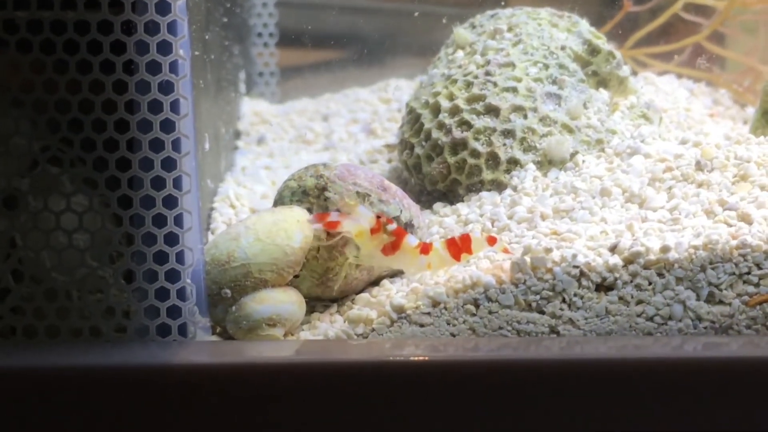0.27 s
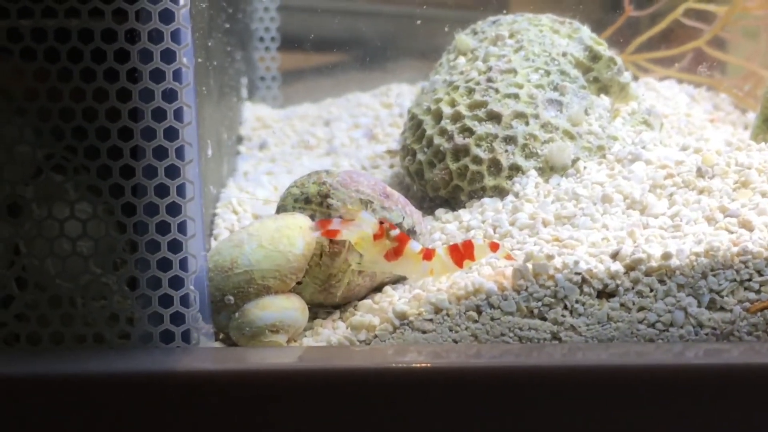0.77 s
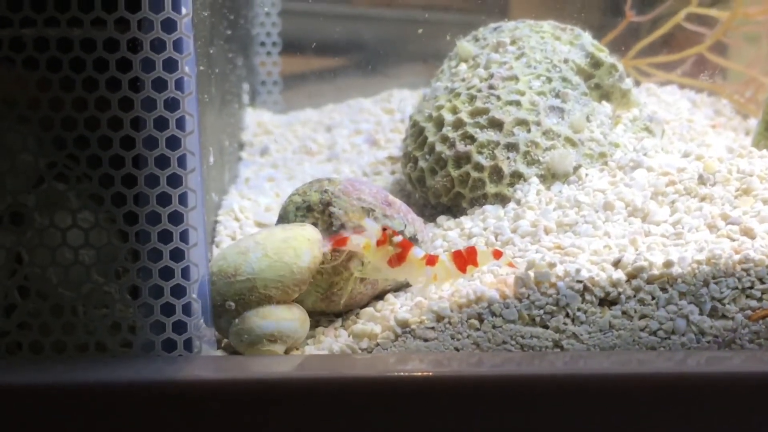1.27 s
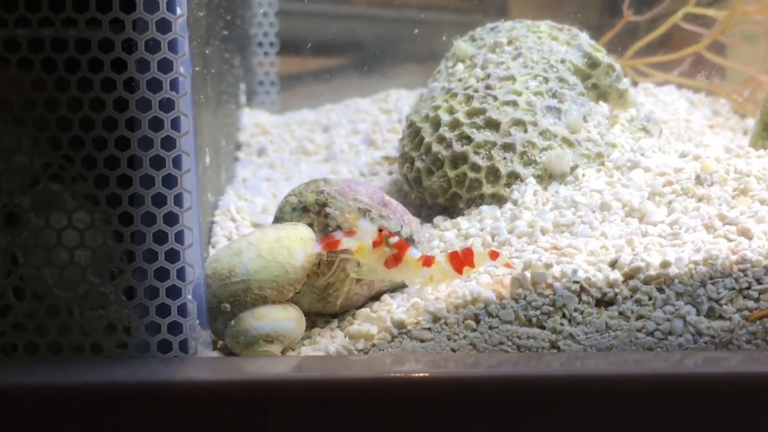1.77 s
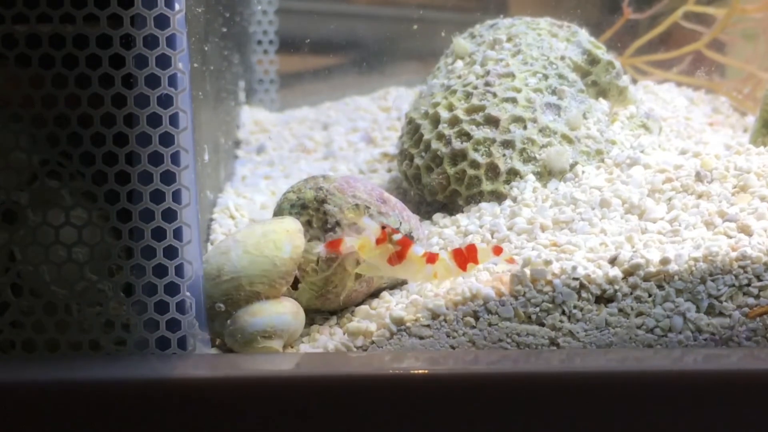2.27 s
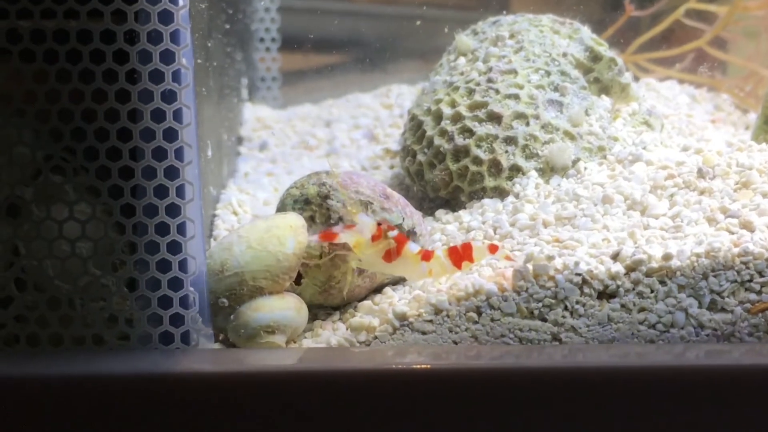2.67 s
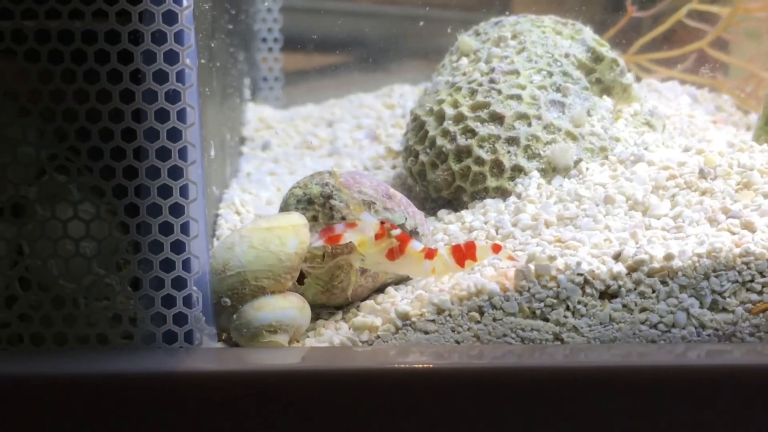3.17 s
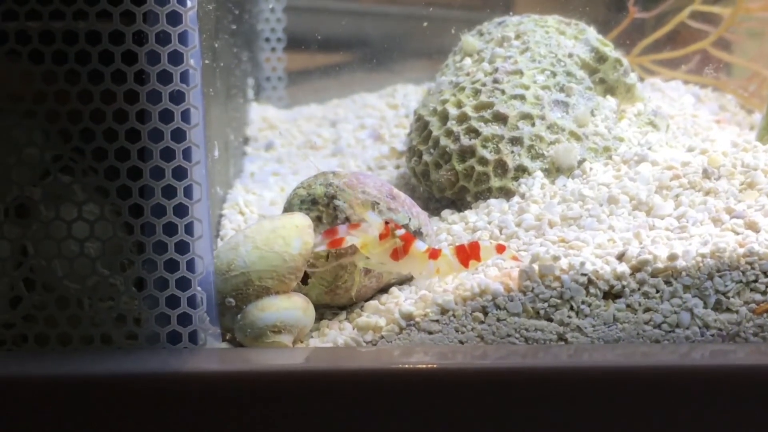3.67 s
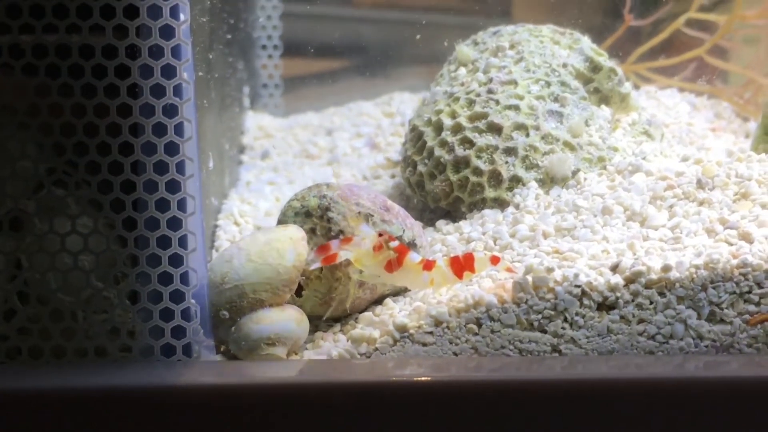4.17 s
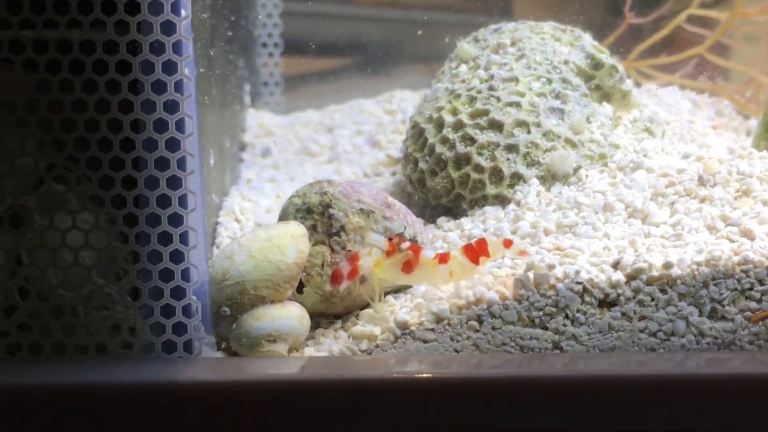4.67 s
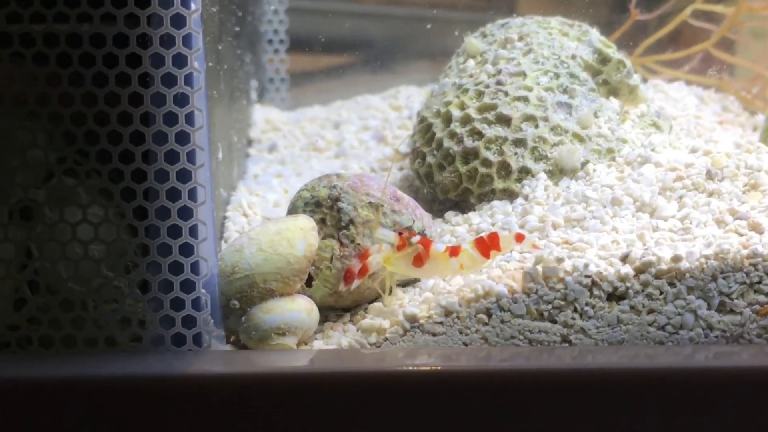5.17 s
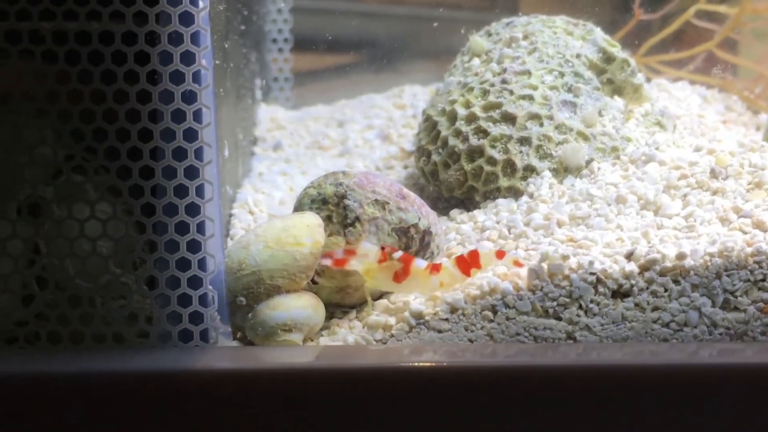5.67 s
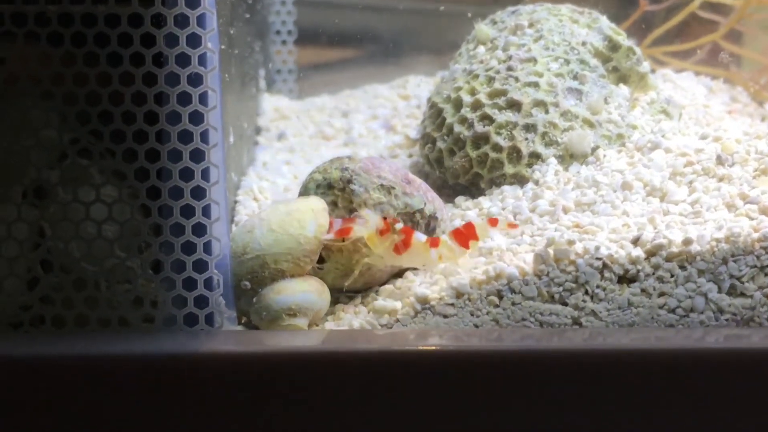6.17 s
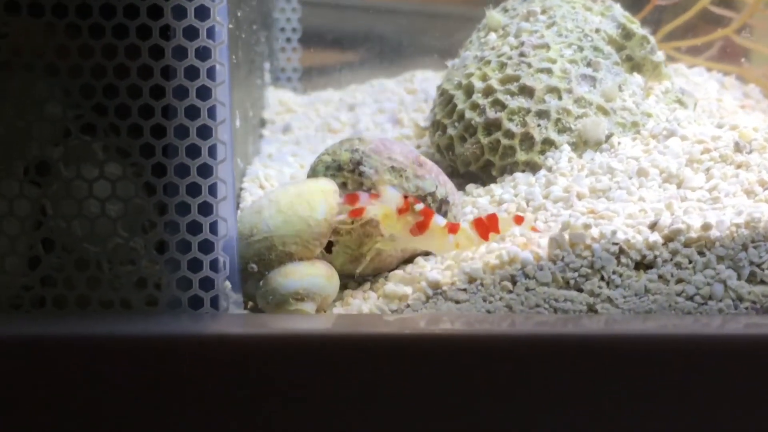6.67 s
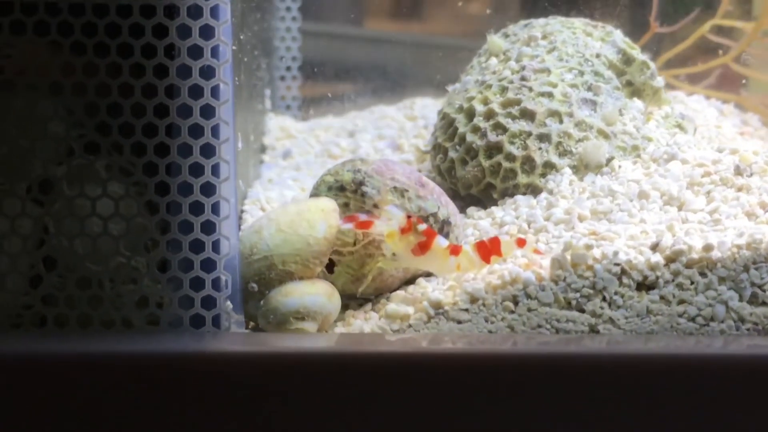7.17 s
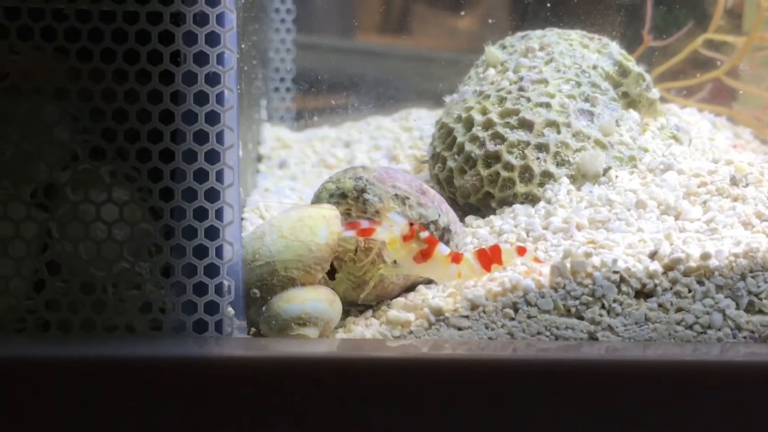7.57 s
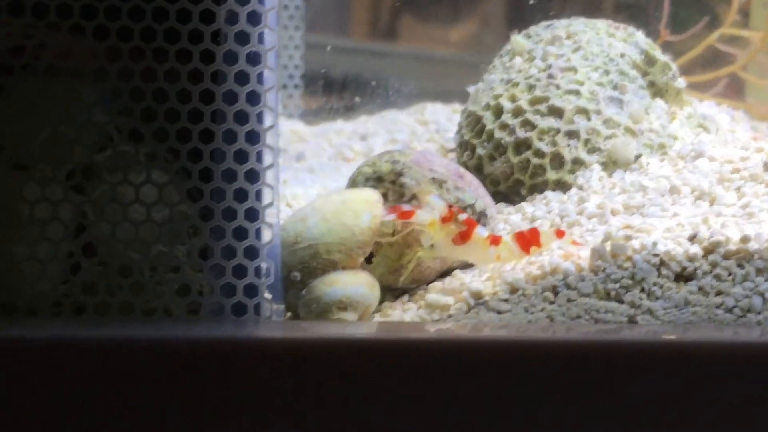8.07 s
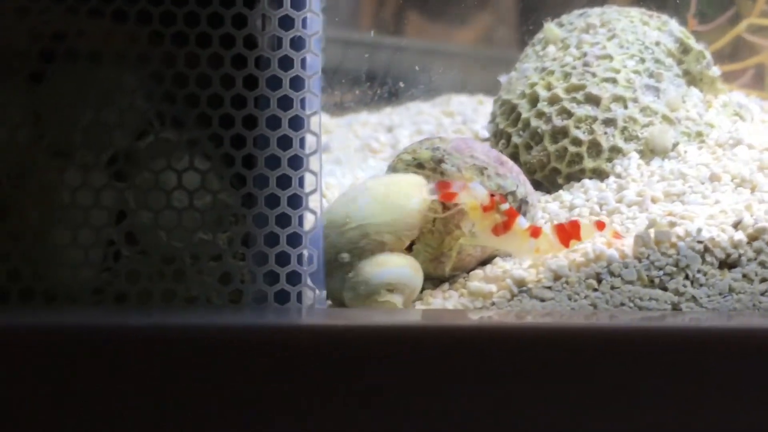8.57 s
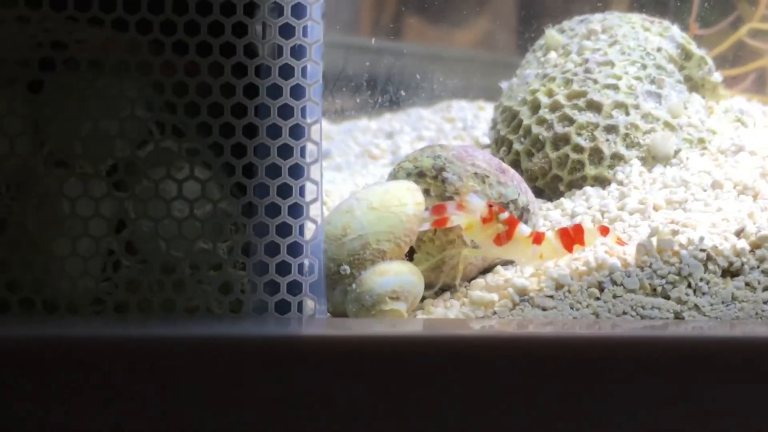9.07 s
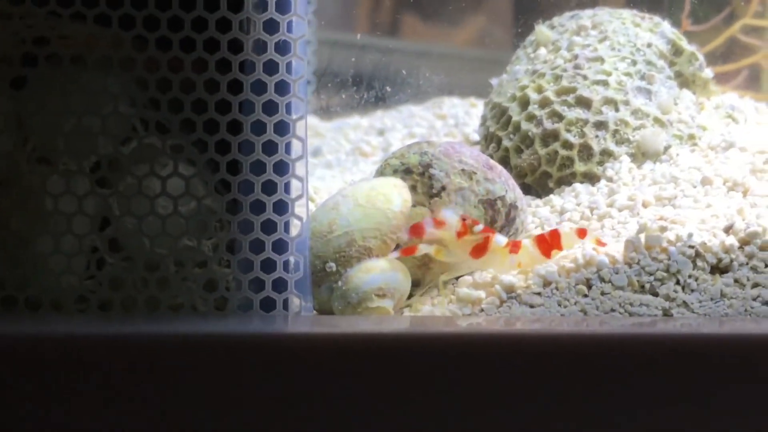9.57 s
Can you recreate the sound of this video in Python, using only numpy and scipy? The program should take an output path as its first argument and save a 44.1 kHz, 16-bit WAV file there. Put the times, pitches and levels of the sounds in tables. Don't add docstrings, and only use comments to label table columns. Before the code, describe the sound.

A low electrical aquarium hum with faint bubbling runs throughout, broken by two bright claw cracks early and a louder one near eight seconds.

```python
import sys
import numpy as np
from scipy import signal
from scipy.fft import rfft, irfft, next_fast_len
from scipy.io import wavfile
from scipy.ndimage import uniform_filter1d

SR = 44100
rng = np.random.default_rng(int(sys.argv[2]) if len(sys.argv) > 2 else 0)


def rack_gain(trim_db):
    fader = np.asarray(trim_db, float)
    return 10 ** (fader / 20)


def unload_audio(sound):
    columns = np.transpose(np.atleast_2d(sound))
    steps = np.round(np.clip(columns, -1, 1) * 32767)
    wavfile.write(sys.argv[1], SR, steps.astype(np.int16))


N = 432178


def read(points, hz):
    f, value = np.transpose(points)
    return np.interp(np.log(hz + 1), np.log(f + 1), value)


def add(mix, s, sound):
    part = mix[round(s * SR):][:len(sound)]
    part += sound[:len(part)]


def coloured(x, points):
    size = next_fast_len(len(x))
    gain = rack_gain(read(points, np.fft.rfftfreq(size, 1 / SR)))
    return irfft(rfft(x, size) * gain, size)[:len(x)]


def band(x, low_hz, high_hz):
    return signal.sosfilt(signal.butter(4, [low_hz, high_hz], "band", fs=SR, output="sos"), x)


# frequency in Hz, level in dB per Hz.
RUMBLE = [(15, -101), (25, -80), (35, -73.5), (50, -68), (62, -59.5), (75, -68.5), (90, -71.5), (110, -71),
          (150, -74.5), (190, -74.5), (230, -78), (280, -82), (400, -90.5), (600, -95.5)]
# frequency in Hz, level in dB per Hz.
HISS = [(300, -100), (600, -93.5), (1000, -93), (1550, -97.5), (2900, -99.5), (4500, -101), (4900, -103),
        (5600, -99), (9000, -98), (10000, -99), (10450, -104), (11200, -100), (15500, -106), (17000, -110)]
# frequency in Hz, width in Hz, level in
# dB rms.
RESONANCES = [(56.36, 3.9, -48.5), (69.7, 2.5, -56.5), (88, 2.7, -59), (199.5, 5.1, -61), (210.4, 4.7, -57.5),
              (242.6, 6.5, -66.5), (344.6, 52, -69), (499, 49, -72.5),
              (712, 20, -72), (762, 14, -73), (806, 16, -74.5), (1055, 34, -68.5), (1296, 91, -76),
         (1891, 96, -77), (2234, 15.66, -75.5), (2196, 430, -68), (2410, 110, -76.5), (2887, 94, -77.5),
         (3248, 300, -75.5), (6200, 250, -77.5)]
# frequencies in Hz, then the level of each in dB rms.
WHINE_HZ = [1620, 2889, 3191, 4065, 5110, 6240, 6659, 7158]
WHINE_DB = [-79, -79.5, -83, -88.5, -82, -85.5, -80.5, -81.5]


def flow_power(hz):
    rumble = rack_gain(read(RUMBLE + [(3000, -140)], hz)) ** 2
    hiss = rack_gain(read([(50, -140)] + HISS, hz)) ** 2
    power = rumble + hiss
    whines = [(f, 8, db) for f, db in zip(WHINE_HZ, WHINE_DB)]
    for centre, width, db in RESONANCES + whines:
        bell = np.exp(-2 * ((hz - centre) / width) ** 2)
        power = power + rack_gain(db) ** 2 * bell / (width * np.sqrt(np.pi / 2))
    return power


def flow():
    patchy_db, swell_db = 0.95, 1.03
    swell_hz = 2500
    size = next_fast_len(N)
    power = flow_power(np.fft.rfftfreq(size, 1 / SR))
    x = irfft(rfft(rng.standard_normal(size)) * np.sqrt(power * SR / 2), size)[:N]
    z = signal.stft(x, nperseg=1024)[2]
    patches = uniform_filter1d(rng.standard_normal(z.shape), size=8, axis=0)
    patches = uniform_filter1d(patches, size=8, axis=1)
    swell = uniform_filter1d(rng.standard_normal(z.shape[1]), size=25)
    share = 1 / (1 + (np.fft.rfftfreq(1024, 1 / SR)[:, None] / swell_hz) ** 2)
    field_db = patchy_db * patches / patches.std() + swell_db * share * swell / swell.std()
    return signal.istft(z * rack_gain(field_db), nperseg=1024)[1][:N]


# multiple of the mains frequency, level in dB rms.
HUM = [(1, -42.5), (2, -40.5), (3, -51), (5, -69), (6, -74.5), (7, -77.5), (8, -71.5), (13, -86), (15, -78),
       (18, -85), (19, -76.5), (27, -83)]
# frequencies in Hz, then the level of each in dB rms.
ROTOR_HZ = [178.26, 351, 419, 491]
ROTOR_DB = [-59, -74, -80, -78]


def hum():
    mains_hz = 59.991
    lag = 1.3
    t = np.arange(N) / SR
    out = np.zeros(N)
    for k, db in HUM:
        out += rack_gain(db) * np.cos(k * 2 * np.pi * mains_hz * t - lag * (k - 1))
    for hz, db in zip(ROTOR_HZ, ROTOR_DB):
        out -= rack_gain(db) * np.cos(2 * np.pi * hz * t)
    return np.sqrt(2) * out


BUBBLE_HZ = (900, 3200)


def bubbles():
    level_db, per_second, pitches = -69.5, 46, 16
    t = np.arange(1500) / SR
    out = np.zeros(N)
    for hz in np.geomspace(*BUBBLE_HZ, pitches):
        ping = np.sin(2 * np.pi * hz * t * (1 + 3.0 * t))
        ping = ping * np.exp(-t / .006) * np.clip(t / 0.0014, 0, 1)
        size = rack_gain(3.18 * np.minimum(rng.exponential(1, N), 2))
        born = rng.random(N) < per_second / pitches / SR
        out += signal.oaconvolve(size * born, ping)[:N]
    return rack_gain(level_db) * out


# start in seconds, level in dB, frequency in Hz, time to fall 60 dB in s.
KNOCK = (6.922, -38, 170, .12)


def add_knock(mix):
    s, db, hz, t60 = KNOCK
    t = np.arange(SR // 4) / SR
    add(mix, s, rack_gain(db - 60 * t / t60) * np.sin(2 * np.pi * hz * t) * np.clip(t / 0.012, 0, 1))


# start in seconds, level in dB as heard through the noise reducer,
# lowest Hz, highest Hz, time to fall 60 dB in seconds.
TICKS = [(.744, -64, 3500, 10000, 0.19), (3.917, -58, 3800, 6300, .05), (3.924, -63.5, 3240, 6300, .4),
         (7.845, -63.5, 4020, 13000, 0.3), (7.848, -67, 12200, 12700, 0.092), (7.85, -65, 9150, 9800, .4),
         (7.848, -62, 6000, 7000, 0.52), (7.895, -69.5, 7000, 12000, .1), (8.884, -64.5, 5830, 7350, 0.73),
         (8.886, -58, 8400, 9600, .12), (8.915, -64, 8400, 9600, .12), (8.886, -64.5, 3000, 4400, 0.25)]


def add_ticks(mix):
    t = np.arange(SR // 2) / SR
    for s, db, low_hz, high_hz, t60 in TICKS:
        x = band(rng.standard_normal(len(t)), low_hz, high_hz)
        rustle = rack_gain(-60 * t / t60)
        click = rack_gain(-8 - 60 * t / 0.026)
        grain = x / x.std() * (rustle + click) * np.clip(t / 0.002, 0, 1)
        add(mix, s, rack_gain(7.5 + db) * grain)


# frequency in Hz, time to fall 60 dB in seconds.
ROOM = [(1000, 0.44), (4000, 0.44), (8000, 0.51), (12000, 0.4), (16000, 0.28)]


def room(length):
    hz, t, z = signal.stft(rng.standard_normal(length), SR, nperseg=256)
    fade = rack_gain(-60 * t / read(ROOM, hz)[:, None])
    tail = signal.istft(z * fade, SR, nperseg=256)[1][:length]
    return tail / np.linalg.norm(tail)


# echo delays in milliseconds, then the level of each in dB.
FAR_MS = [20, 34, 52, 66]
FAR_DB = [-38, -40, -38, -39]
# frequency in Hz, level in dB.
ROOM_COLOUR = [(1000, 14), (3000, 11.5), (5000, 7.5), (6500, 8.5), (8500, 0.5), (11500, 0), (14000, -8.5),
               (15600, -10.5), (15750, -67)]


def room_answer(out):
    far = rack_gain(-27.5) * room(len(out))
    for ms, echo_db in zip(FAR_MS, FAR_DB):
        burst = rng.standard_normal(300) * np.exp(-np.arange(300) / 80)
        add(far, ms / 1000, rack_gain(echo_db - 16) * burst)
    return coloured(signal.oaconvolve(out[:SR // 100], far)[:len(out)], ROOM_COLOUR)


# frequency in Hz, level in dB, time to fall 60 dB in seconds.
GLASS = [(4386, -21, .02), (5066, -11, .012), (5780, -11.5, .018), (6190, -7, 0.019), (6720, -15, 0.016),
         (6950, -11.5, .022), (7800, -6, 0.0092), (8400, -0.5, 0.014), (9310, -2.5, 0.019),
         (10020, -5.5, 0.014), (11620, -8, .018), (12300, -5, .014), (13600, -6, 0.014),
         (15300, -12.5, .012)]


def panes(t):
    out = np.zeros(len(t))
    for hz, level, t60 in GLASS:
        out += rack_gain(level - 60 * t / t60) * np.sin(2 * np.pi * (hz * t + rng.random()))
    return out


# frequency in Hz, level in dB per Hz.
SNAP_COLOUR = [(470, -78), (800, -47), (3300, -21), (4260, -13), (6070, -10), (7720, -9), (8760, -2),
               (10500, -10), (13800, -7.5), (15900, -15.5), (16500, -45)]


def scattered(t):
    level_db, t60 = -6, .021
    return coloured(rng.standard_normal(len(t)), SNAP_COLOUR) * rack_gain(level_db - 60 * t / t60)


def walls(length, db):
    first_ms, spread = .22, 1.327
    level_db, fade_db_per_ms = -14.5, 4.7
    ms = first_ms * spread ** np.arange(12)
    paths = np.zeros(length)
    paths[np.round(ms * SR / 1000).astype(int)] = rack_gain(db + level_db - fade_db_per_ms * ms)
    return paths


def crack():
    spike_hz, half_width_s = 9500, .000068
    port_hz, port_db, port_t60 = 13760, -12, 0.0034
    t = np.arange(-16, 200) / SR
    spike = -np.cos(2 * np.pi * spike_hz * t) * np.exp(-((t - 1e-5) / half_width_s) ** 2 / 2)
    port = rack_gain(port_db - 60 * t / port_t60) * np.cos(2 * np.pi * port_hz * t) * (t > -4e-5)
    return spike - port


def pane_push(t):
    u = (t - .0004) / .00009
    return rack_gain(-23) * (.25 - u) * np.exp(-u ** 2)


def snap(t, ring, db, ring_db, room_db, bright_db):
    tilt = [(4000, -bright_db), (15000, bright_db)]
    paths = coloured(walls(len(t), ring_db), tilt)
    paths[0] = 1
    out = signal.oaconvolve(paths, crack())[:len(t)]
    rise = np.clip((t - .00045) / .0003, 0, 1)
    out = out + rack_gain(ring_db) * rise * coloured(scattered(t), tilt)
    late = rack_gain(room_db) * room_answer(out)
    glass = rack_gain(-13.5 + ring_db) * coloured(ring, tilt)
    return rack_gain(db) * (out + pane_push(t) + rise * (glass + late))


# start in seconds, peak level in dB.
SNAPS = [
    (1.007895, -2.5),
    (2.288256, -4.2),
    (7.918209, -.9),
]
# glass ring in dB, room in dB, brightness in dB.
CLAW = [
    (0.5, 3.5, -0.5),
    (0, 4, 1),
    (3.5, 3.5, -0.5),
]


def add_snaps(mix):
    t = np.arange(SR // 2) / SR
    ring = panes(t)
    for (s, db), claw in zip(SNAPS, CLAW):
        add(mix, s - 16 / SR, snap(t, ring, db, *claw))


def scene():
    mix = coloured(flow() + hum() + bubbles(), [(15700, 0), (15740, -90)])
    add_knock(mix)
    add_ticks(mix)
    add_snaps(mix)
    return mix[None]


# frequency in Hz, change in dB.
HUSH = [(200, -0.42), (500, -1.5), (2700, -1.5), (3500, -7), (6000, -9.5), (9000, -10), (15000, -8)]


def noise_reducer(x):
    wake_db, hold_s = -33, 0.402
    loud = uniform_filter1d(band(x, 4000, 15000) ** 2, size=44) > rack_gain(wake_db) ** 2
    at = np.arange(N)
    onset = loud & ~np.roll(loud, 200)
    since = at - np.maximum.accumulate(np.where(onset, at, -N))
    opened = uniform_filter1d(np.roll(since < hold_s * SR, -60) * 1., size=60)
    slow = uniform_filter1d(opened, size=400) * (since > 400)
    opened = np.maximum(opened, slow)
    return opened * x + (1 - opened) * coloured(x, HUSH)


def top_cut(x):
    return signal.sosfilt(signal.butter(12, 16830, fs=SR, output="sos"), x)


def record(dry):
    out = noise_reducer(dry[0])
    out = coloured(out, [(15400, 0), (16000, -8), (16500, -18), (16900, -40), (17200, -90)])
    return top_cut(out[None])


dry = scene()
out = record(dry)
unload_audio(out)
```